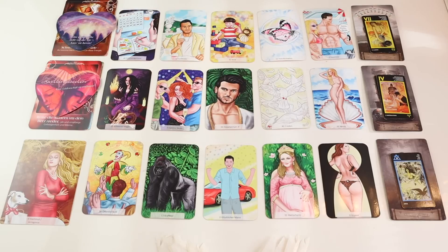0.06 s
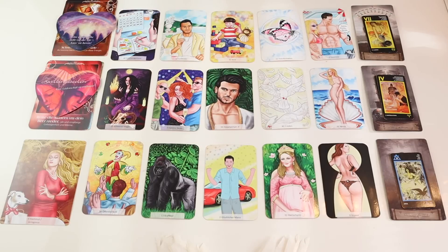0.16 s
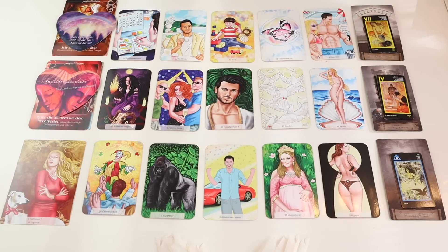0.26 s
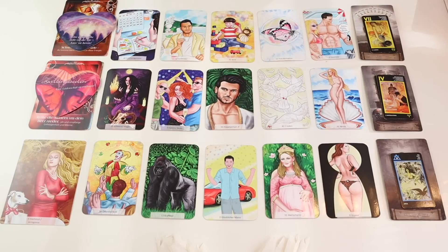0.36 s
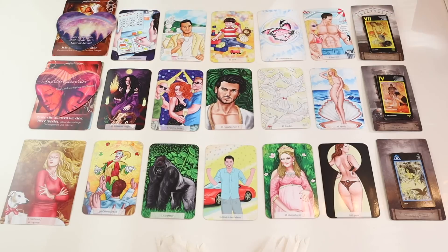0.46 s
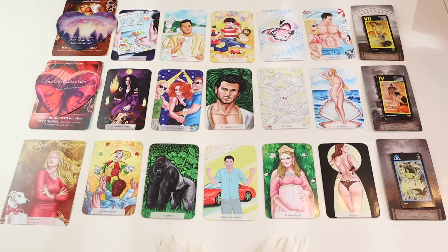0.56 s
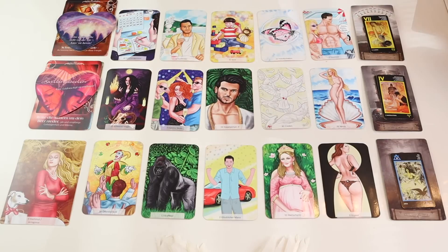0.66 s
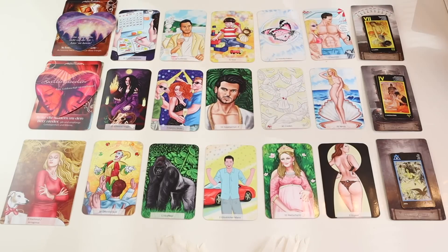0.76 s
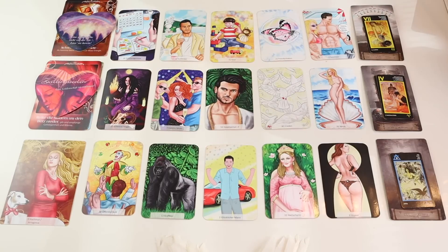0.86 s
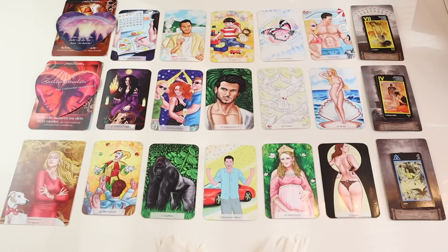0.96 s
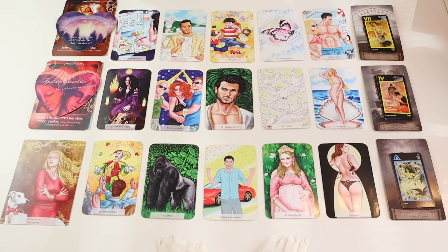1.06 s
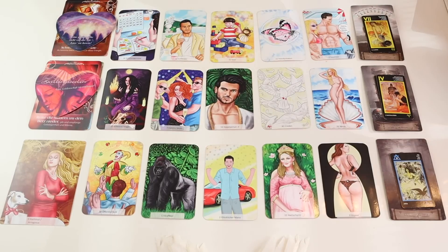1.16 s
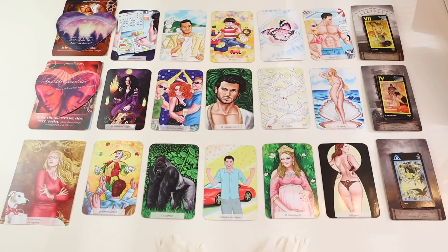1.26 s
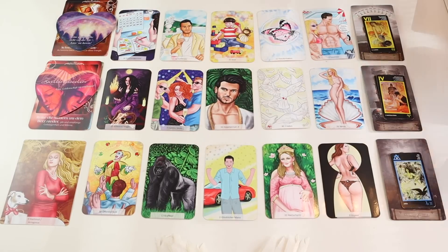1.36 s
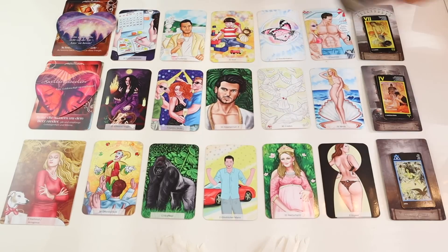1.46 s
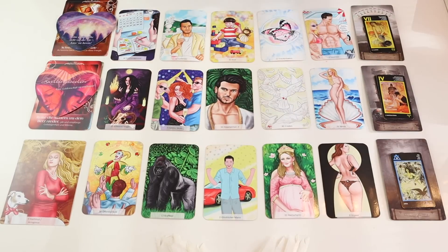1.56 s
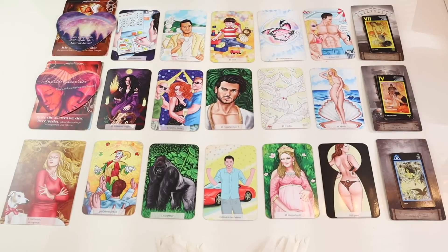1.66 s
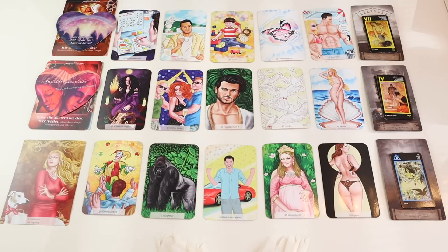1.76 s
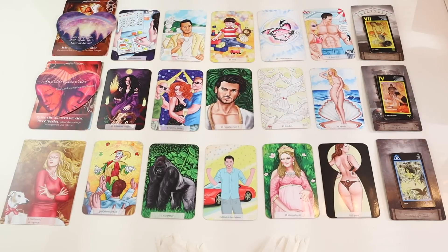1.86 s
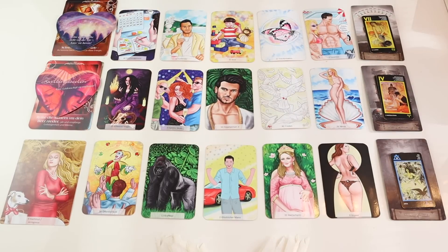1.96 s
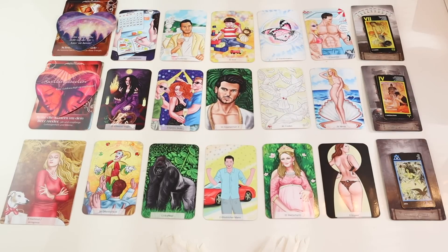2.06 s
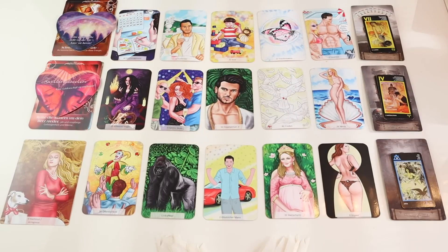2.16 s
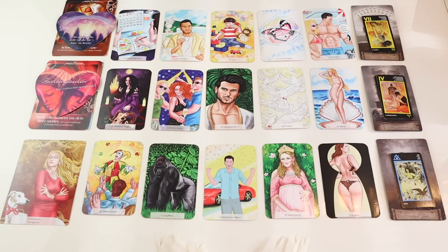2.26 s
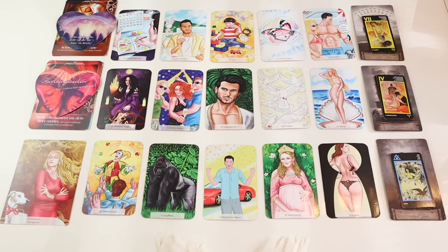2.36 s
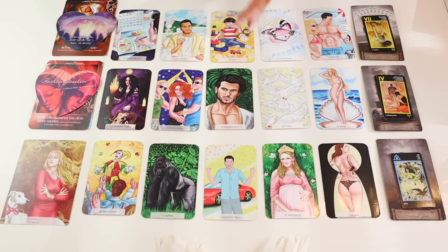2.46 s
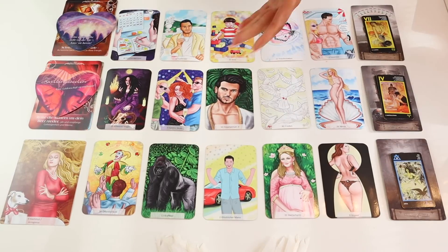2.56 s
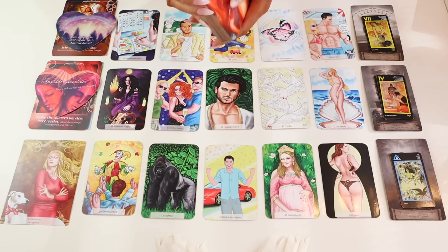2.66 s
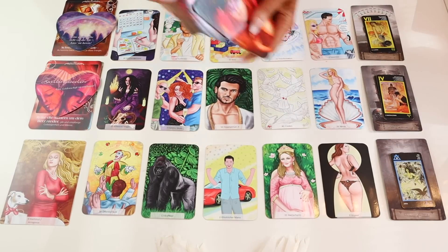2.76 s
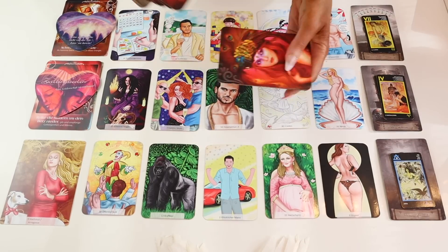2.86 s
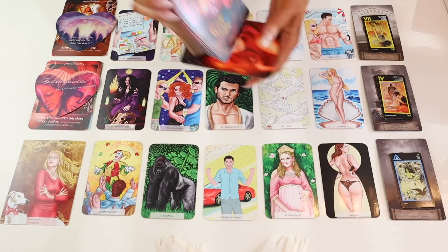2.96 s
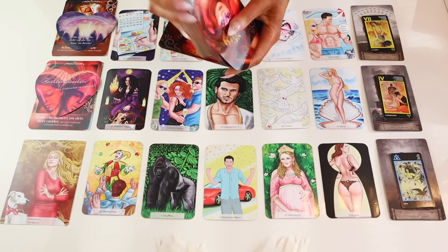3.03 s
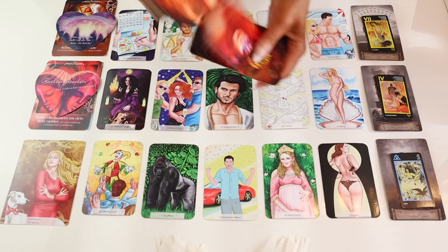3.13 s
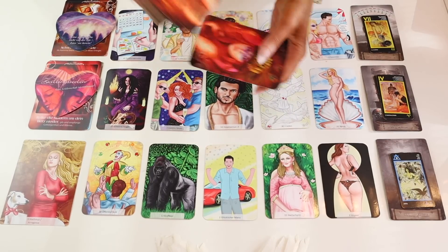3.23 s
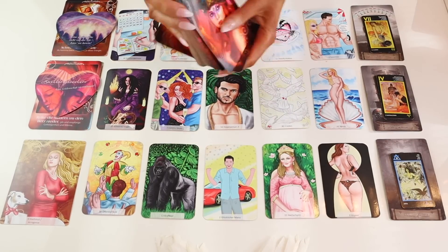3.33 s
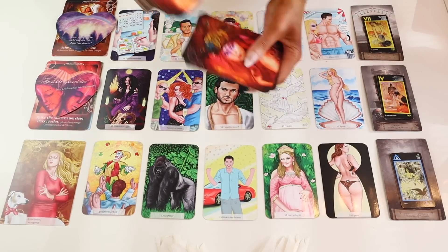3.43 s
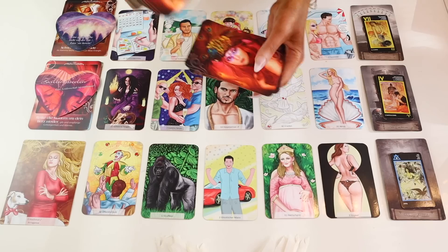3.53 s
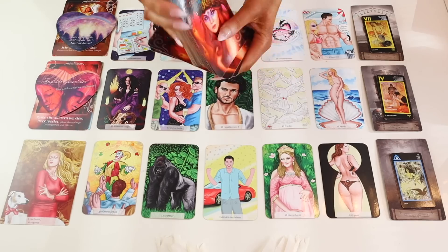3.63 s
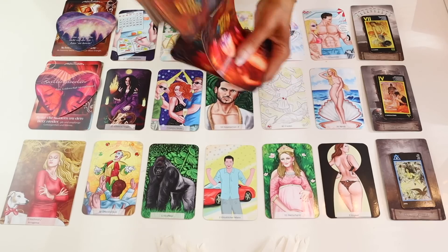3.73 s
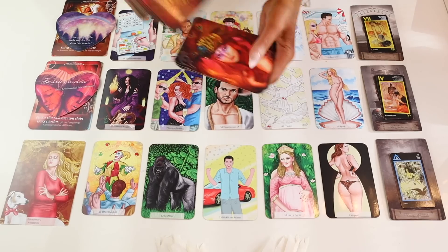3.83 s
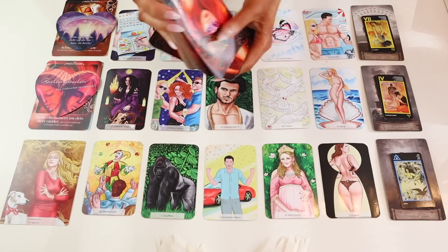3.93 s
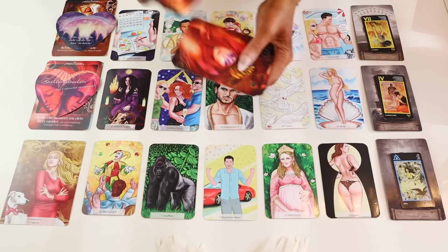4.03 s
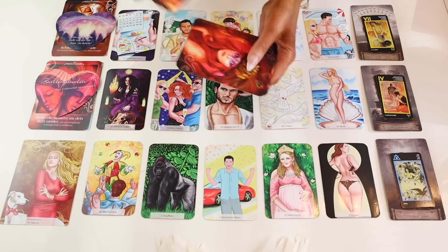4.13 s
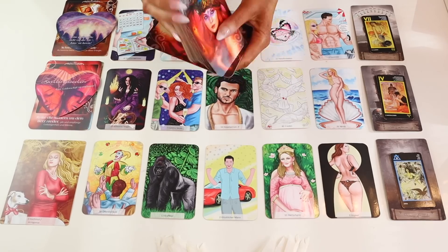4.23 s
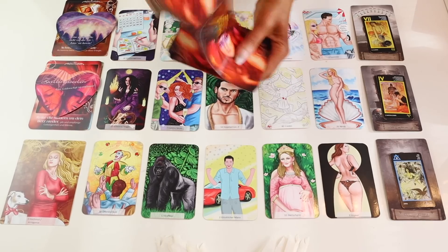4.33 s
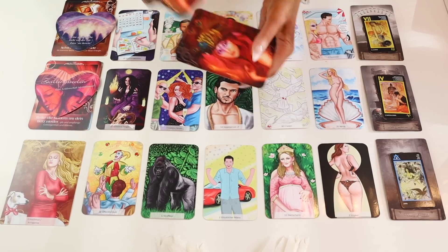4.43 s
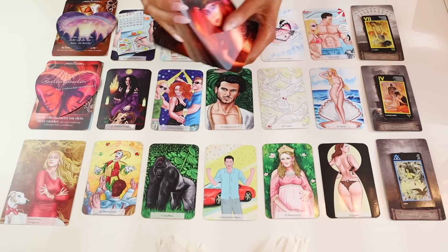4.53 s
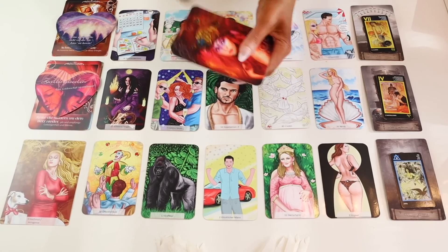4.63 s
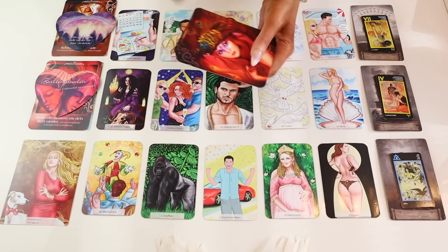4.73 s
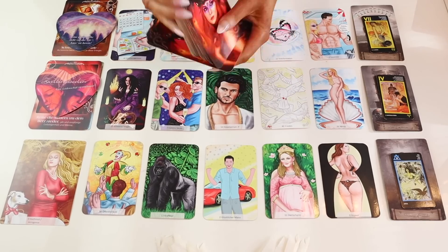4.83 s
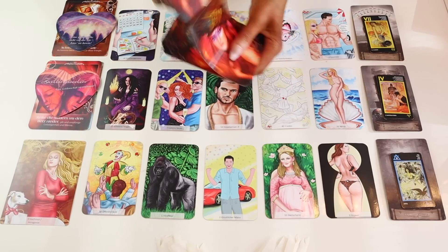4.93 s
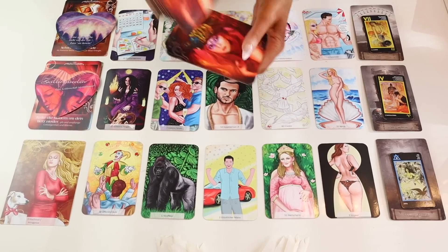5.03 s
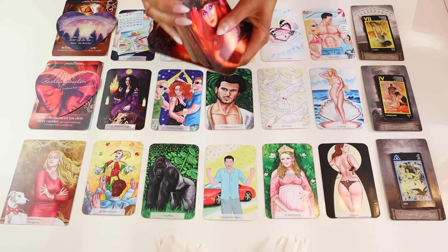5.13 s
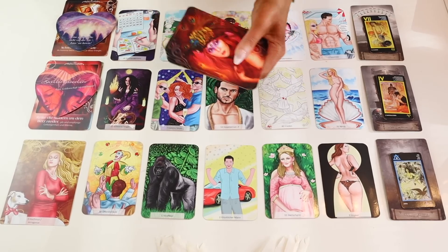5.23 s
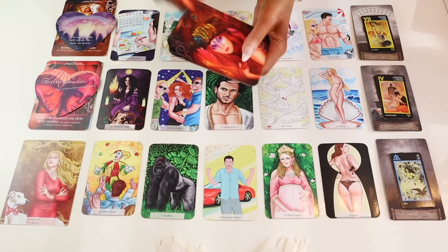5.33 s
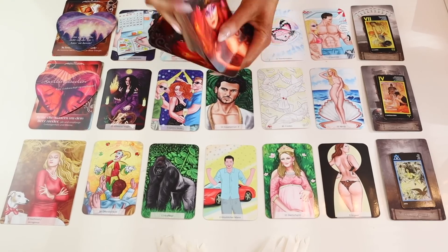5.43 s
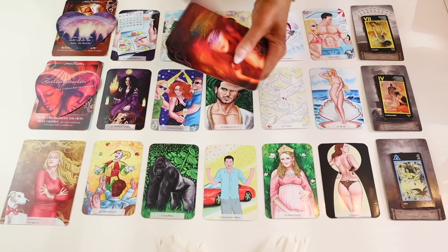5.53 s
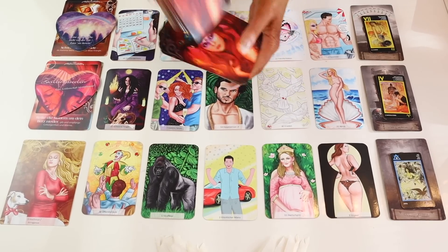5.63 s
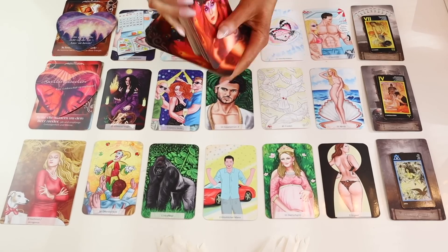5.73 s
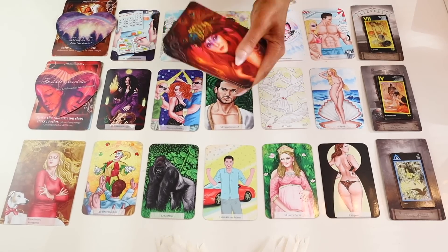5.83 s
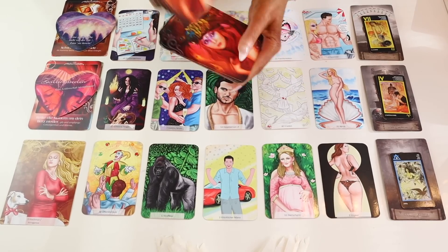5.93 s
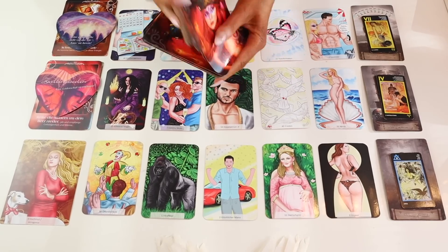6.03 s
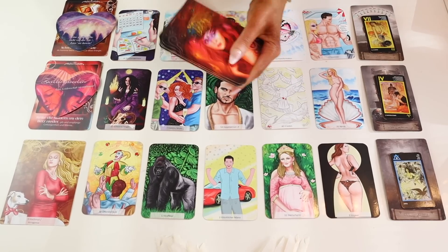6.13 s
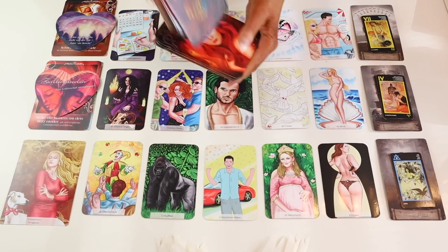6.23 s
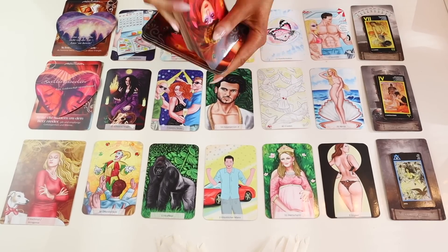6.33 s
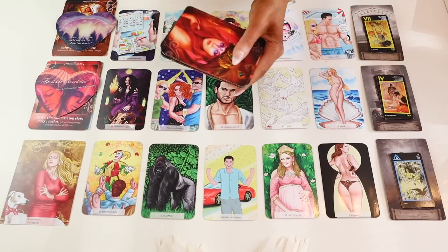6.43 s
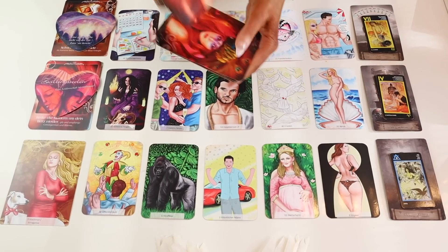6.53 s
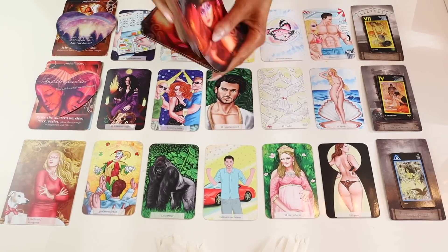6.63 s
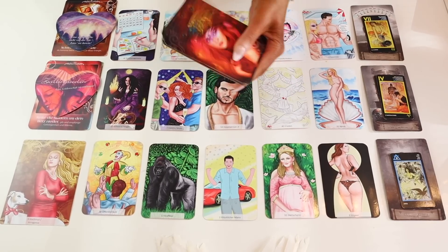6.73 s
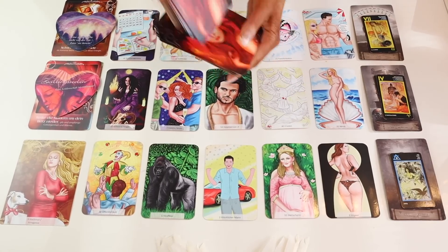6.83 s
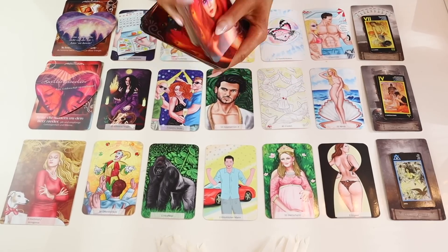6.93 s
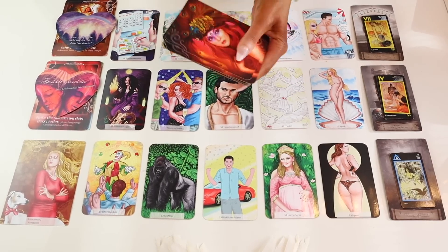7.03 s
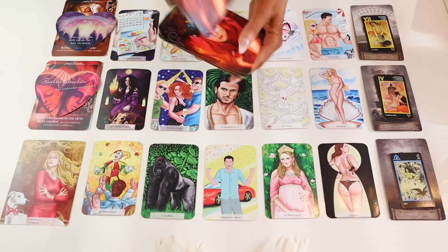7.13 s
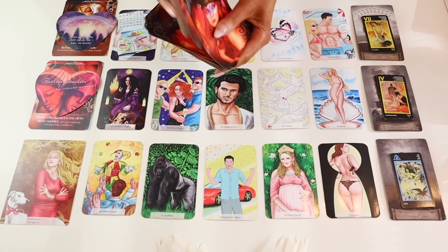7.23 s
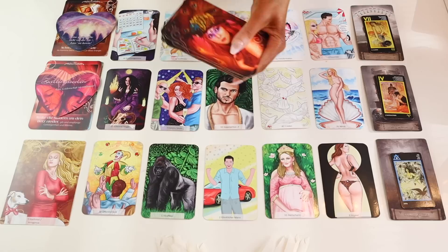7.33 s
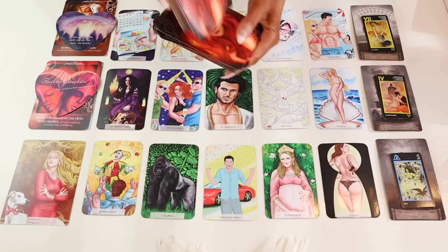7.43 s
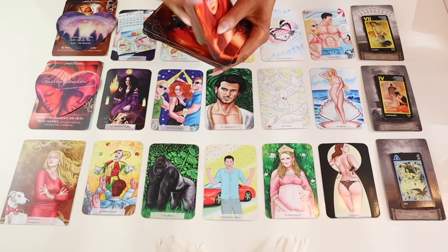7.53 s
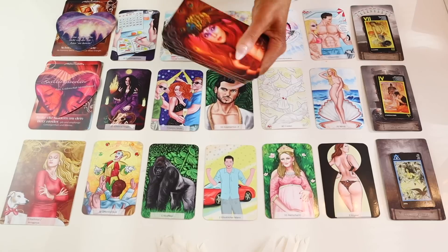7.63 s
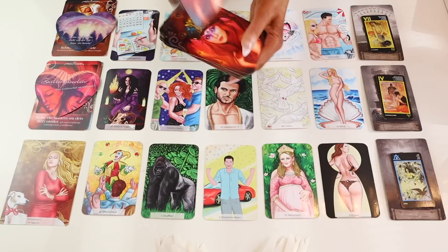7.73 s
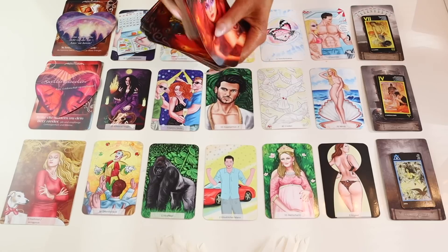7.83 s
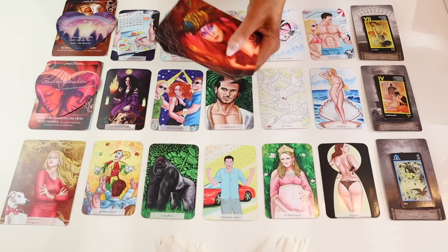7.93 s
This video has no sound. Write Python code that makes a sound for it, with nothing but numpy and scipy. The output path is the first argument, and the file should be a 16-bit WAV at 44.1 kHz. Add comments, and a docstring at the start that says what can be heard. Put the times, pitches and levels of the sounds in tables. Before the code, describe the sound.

Faint handling taps, then a brisk regular overhand card shuffle, each packet hissing down and slapping home, with light clatters between strokes.

```python
"""In a small hard room, a deck of large cards is shuffled overhand above a table.
First the deck is picked up and knocked straight, over soft rubbing and low shaking. In each stroke a packet
hisses down the deck, its edge touches, and it slaps home; between strokes the hand picks the next packet with
a tap and a short clatter. Slides and rubbing are shaped noise; every contact is a short push with noisy
card edges, sent through resonances of palm and cards. The walls add echoes; steady hiss and hum lie below."""
import sys
import numpy as np
from scipy import signal
from scipy.fft import rfft, irfft, next_fast_len
from scipy.io import wavfile
from scipy.ndimage import map_coordinates

SR = 44100
rng = np.random.default_rng(int(sys.argv[2]) if len(sys.argv) > 2 else 0)


def pcm_store(signal):
    """Save signal as 16-bit PCM."""
    levels = np.round(np.clip(np.atleast_2d(signal), -1, 1) * 32767)
    wavfile.write(sys.argv[1], SR, levels.astype(np.int16).T)


N = 352359

# Loudness of hands and cards rubbing, before it calms after contacts: [t/s, level/dB]
RUSTLE_LEVEL = [(0.0, -67), (1.67, -80), (2.22, -63), (2.45, -72), (2.83, -49), (3.0, -52), (3.54, -43),
                (5.07, -42.5), (6.85, -38), (7.3, -36.5), (7.52, -41), (7.99, -36.5)]
# Relative spectrum of the rubbing: [f/Hz, level/dB per Hz]
RUB_SPECTRUM = [(200, -7.5), (700, 3.5), (2500, 5.5), (7000, 8), (12000, 4)]
# Loudness of the low shaking that reaches the microphone, before its wobble: [t/s, level/dB]
RUMBLE_LEVEL = [(0.0, -52), (0.4, -64.5), (1.07, -54), (1.18, -74), (1.56, -57), (1.69, -68), (2.29, -53),
                (2.47, -73.5), (3.49, -59.5), (3.89, -70), (4.3, -54), (4.67, -70.5), (5.99, -65),
                (6.05, -56.5), (6.94, -67), (7.17, -51), (7.48, -68), (7.56, -50.5)]
# Relative spectrum of the shaking: [f/Hz, level/dB per Hz]
SHAKE_SPECTRUM = [(12, -1), (28, 2.5), (45, -6), (70, -14), (110, -46)]
# Relative spectrum of the steady hiss and hum: [f/Hz, level/dB per Hz]
HISS_SPECTRUM = [(47, -37), (80, 0), (296, -1.5), (422, -5.5), (1170, -9), (1250, -8), (1430, -10),
                 (15000, -18), (16000, -14.5)]
# The deck is handled and knocked straight:
# [t/s, level/dB, card flex f/Hz, thud level/dB, crack level/dB, clatter level/dB, room level/dB]
HANDLING = [(0.942, -33, 2240, -3, 1, -11.5, -4.5), (0.961, -43, 1430, 2, -5.5, -12, -11),
            (1.001, -38, 1730, -4, -6.5, -13, -9), (1.079, -38.5, 1750, -13, -14, -13, -16),
            (1.69, -41.5, 1820, -6, -17, -20, -16), (1.71, -49.5, 750, 15, 11, -5, -3),
            (1.957, -44, 1700, -15, -20, -20, -10), (1.979, -37, 770, 8, -18, -4.5, -0.5),
            (2.088, -46, 900, 0, -30, 4, -5), (2.106, -35, 1300, -19, -30, 5, -0.5),
            (2.113, -14.5, 2670, -5, -40, -8, -0.5), (2.552, -41.5, 3200, -30, -6.5, 3.5, -3),
            (2.76, -39.5, 1100, 17, 7.5, -15, -6)]
# A light first slide: [start t/s, level/dB, tilt/dB per octave, end t/s]
FALSE_START = (2.809, -35, 2.5, 2.835)
# Shuffle strokes: [slide start t/s, slide level/dB, slide tilt/dB per octave,
#  edge touch t/s, touch level/dB, touch flex f/Hz,
#  slap t/s, slap level/dB, slap flex f/Hz, slap thud level/dB, slap crack level/dB, slap clatter level/dB]
STROKES = [(2.862, -17.5, 9, 2.889, -13, 740, 2.909, -7.5, 765, -23, -11.5, -11.5),
           (3.171, -14, 14, 3.206, -14, 800, 3.22, -19, 3080, 6, -11.5, -8.5),
           (3.486, -20, 10.5, 3.514, -12.5, 5100, 3.533, -6, 4500, -25, 8, -21),
           (3.79, -21, 6, 3.818, -14, 1780, 3.837, -10.5, 1410, 7, 0.5, -20),
           (4.086, -14.5, 11, 4.115, -14, 1820, 4.134, -3.5, 4170, -16, 7, -20),
           (4.384, -17.5, 10, 4.412, -17, 1910, 4.431, -6.5, 2980, 0.5, -2.5, -13.5),
           (4.683, -17, 9.5, 4.713, -14.5, 1950, 4.734, -7.5, 960, 3.5, 2.5, -33),
           (4.983, -17.5, 8, 5.011, -17, 1840, 5.032, -5, 2800, 3, 6.5, -29),
           (5.273, -18.5, 8.5, 5.303, -14, 1840, 5.323, -2, 2880, -5.5, 9, -28),
           (5.566, -13.5, 10.5, 5.598, -18.5, 1780, 5.619, -3, 2450, -2.5, 6, -18),
           (5.866, -17.5, 7, 5.895, -19, 4500, 5.917, -6, 2800, 3, 3, -14),
           (6.166, -16.5, 4.5, 6.195, -21, 1850, 6.215, -6, 1330, 7.5, 2.5, -21),
           (6.455, -19.5, 10.5, 6.49, -20, 1880, 6.511, -7.5, 1170, 6.5, 2.5, -38),
           (6.762, -13, 7.5, 6.796, -18, 1830, 6.816, -9, 1080, 4.5, 6, -16),
           (7.072, -16, 9.5, 7.103, -21, 1820, 7.124, -4, 2370, 4.5, 9.5, -21.5),
           (7.358, -13.5, 9, 7.386, -22.5, 1850, 7.404, -11, 2000, 12, 6.5, -16),
           (7.667, -18, 8, 7.698, -17, 1330, 7.72, -10, 3640, 12, 12, -15),
           (7.944, -20, 6.5, 7.968, -26, 2200, 7.98, -9, 1670, -8, 3.5, -9)]
# Relative spectrum of sliding cards, before each slide's tilt: [f/Hz, level/dB per Hz]
CARD_HISS = [(800, -46), (2200, 1.5), (3500, 7), (5500, 11), (7200, 7), (8600, 9.5), (13500, 3.5),
             (16000, 0)]
# Shared by every edge touch: [thud level/dB, crack level/dB, clatter level/dB, room level/dB]
TOUCH = (-5, 4.5, -15, -8)
# The hand picks the next packet: [t/s, level/dB, flex f/Hz, crack level/dB, clatter level/dB]
PICKS = [(3.078, -10, 2200, 0.5, -11.5), (3.391, -9, 4100, -3, -12), (3.696, -12.5, 756, -1, -12.5),
         (3.995, -15, 1440, 3, -7), (4.292, -16, 1110, 5, -12), (4.591, -11, 3380, -2, -7),
         (4.888, -10.5, 4430, -2, -8.5), (5.179, -18.5, 1130, 1.5, -4.5), (5.474, -25, 3220, 0, -2),
         (5.77, -22, 1300, -2, -12), (6.062, -19.5, 4360, -1.5, -1.5), (6.362, -20, 1290, 3, -14),
         (6.663, -22.5, 1540, 5.5, -9), (6.959, -21.5, 1400, 7, -7), (7.248, -6.5, 3430, 0, -13.5),
         (7.554, -19.5, 1620, -2.5, -5.5), (7.861, -16.5, 1480, 0.5, -7)]
# Shared by every pick: [thud level/dB, room level/dB]
PICK = (-1.5, -7.5)
# A late card follows a slap or a pick: [t/s, level/dB, flex f/Hz, crack level/dB, clatter level/dB]
LATE_CARDS = [(2.917, -17.5, 760, -22, -13), (3.085, -13, 1270, -22, -14), (3.413, -21, 3000, 3, -16),
              (3.72, -27, 3000, 3, -16), (4.915, -27, 2070, 6, -2), (5.208, -22, 2540, 3.5, -10),
              (5.797, -32, 4380, -4.5, 3), (6.091, -25, 3000, 0, -16), (6.37, -21, 1300, 3, -14),
              (6.384, -21.5, 1330, 2.5, -14), (6.682, -21.5, 1270, -7.5, -9.5),
              (6.985, -16.5, 4170, -0.5, -34), (7.586, -20.5, 1190, 2, -24), (7.874, -23, 2000, 4, -10)]
# Shared by every late card: [thud level/dB, room level/dB]
LATE = (-0.5, -12)
# How long echoes take to fall by 60 dB: [f/Hz, decay t/s]
ROOM_DECAY = [(150, 0.77), (500, 0.38), (1500, 0.49), (4000, 0.41), (9000, 0.37), (15000, 0.24)]
# Colour of the microphone: [f/Hz, level/dB]
MICROPHONE = [(100, 2.5), (300, 2), (7000, -8.5), (9000, -8.5), (10800, -16.5), (14000, -10.5),
              (15700, -19)]
# Fall of the treble just below the band limit: [f/Hz, level/dB]
TOP_EDGE = [(15750, -2), (15950, -10), (16800, -44)]

HISS_DB, SLAP_ROOM_DB = -64.5, -10
SLIDE_PAST_TOUCH_S = 0.005
TOP_HZ = 16820  # nothing is left above this


def amp(db):
    """Turn decibels into a plain gain."""
    return 10 ** (np.asarray(db) / 20)


def unit(x):
    """Scale a signal to rms 1."""
    return x / np.sqrt(np.mean(x ** 2) + 1e-20)


def along(points, hz):
    """Read between (f/Hz, value) points on a log frequency axis."""
    f, value = np.transpose(points)
    return np.interp(np.log(hz + 1), np.log(f + 1), value)


def curve(rows):
    """Turn a (t/s, level/dB) table into one gain per sample."""
    s, db = np.transpose(rows)
    return amp(np.interp(np.arange(N) / SR, s, db))


def wobble(rate, size):
    """Draw a smooth random curve through `rate` random points a second."""
    points = rng.standard_normal(int(size * rate / SR) + 4)
    return map_coordinates(points, [np.arange(size) * rate / SR])


def filtered(x, response):
    """Weight each frequency of a signal by a response."""
    size = x.shape[-1]
    padded = next_fast_len(size + 4096)  # spare room for ringing
    spectrum = rfft(x, padded) * response(np.fft.rfftfreq(padded, 1 / SR))
    return irfft(spectrum, padded)[..., :size]


def noise(spectrum, size):
    """Make coloured noise of rms 1 by filtering white noise."""
    white = rng.standard_normal(size)
    return unit(filtered(white, lambda hz: amp(along(spectrum, hz))))


def mode(f, hz, width_hz):
    """Response of one resonance: it rings only after being struck and has peak gain 1."""
    return 1j * f * width_hz / (hz * hz - f * f + 1j * f * width_hz)


def add(track, s, sound):
    """Mix a sound into a track at time s, in place."""
    part = track[round(s * SR):][:len(sound)]
    part += sound[:len(part)]


def contact_rows():
    """List all contacts in time order, with the columns of HANDLING."""
    touches = [(*stroke[3:6], *TOUCH) for stroke in STROKES]
    slaps = [(*stroke[6:], SLAP_ROOM_DB) for stroke in STROKES]
    taps = []
    for rows, (thud_db, room_db) in [(PICKS, PICK), (LATE_CARDS, LATE)]:
        for s, db, hz, crack_db, clatter_db in rows:
            taps.append((s, db, hz, thud_db, crack_db, clatter_db, room_db))
    return sorted([tuple(row) for row in HANDLING] + touches + slaps + taps)


def rustling():
    """Hands and cards rub with uneven noise, which dies down while the cards lie still after a contact."""
    uneven = unit(amp(1.5 * wobble(60, N) + 3 * wobble(900, N)))
    t = np.arange(N) / SR
    touched = np.array(contact_rows())[:, 0]
    latest = np.maximum(np.searchsorted(touched, t) - 1, 0)
    still_s = np.clip(t - touched[latest], 0, .15)
    calm = amp(2.5 - 62 * still_s)
    return uneven * calm * curve(RUSTLE_LEVEL) * noise(RUB_SPECTRUM, N)


def rumbling():
    """Low shaking reaches the microphone as deep noise of wobbling strength."""
    return amp(4.4 * wobble(22, N)) * curve(RUMBLE_LEVEL) * noise(SHAKE_SPECTRUM, N)


def contacts():
    """A packet pushes once, its edges land in turn within a few ms and loose cards clatter.

    Returns the sound towards the microphone and the sound towards the walls."""
    near, walls = np.zeros(N), np.zeros(N)
    t = np.arange(round(.08 * SR)) / SR
    landing = np.tanh(t / 0.00061) / (1 + (t / 0.0018) ** 2) * amp(-60 * t / 0.031)
    push = (t == 0) * np.linalg.norm(landing)  # one sharp push
    flap_decay = amp(-60 * t[:400] / 0.0088)
    for s, db, hz, thud_db, crack_db, clatter_db, room_db in contact_rows():
        # loose cards: about 350 small flaps a second, of random size
        flap_starts = rng.random(len(t)) < 350 / SR
        flap_sizes = flap_starts * amp(3 * rng.standard_normal(len(t)))
        flaps = np.convolve(flap_sizes, flap_decay)[:len(t)] + 0.36
        clatter_fade = amp(clatter_db - 60 * t / 0.086) * np.tanh(t / 0.0016)
        clatter = clatter_fade * flaps * rng.standard_normal(len(t))

        top_hz = 3000 + 2600 * amp(0.19 * crack_db)  # a soft contact stirs less treble

        def palm(f):
            """Air trapped in the palm thuds."""
            return amp(thud_db) * mode(f, 370, 187) * mode(f, 203, 900)

        def cards(f):
            """The cards flex and their edges crack."""
            bend = mode(f, hz, hz) ** 2 + 1.25 * mode(f, 1630, 2330)
            flex = bend / (1 + 1.4j * f / top_hz - (f / top_hz) ** 2)
            return amp(crack_db) * mode(f, 7710, 17600) ** 2 - flex

        edges = filtered(landing * rng.standard_normal(len(t)), cards)
        even = filtered(push, cards)
        thud = filtered(push + clatter, palm)
        loose = filtered(clatter, cards)
        edges = edges * np.linalg.norm(even) / np.linalg.norm(edges)
        add(near, s, amp(db) * (edges + loose + thud))
        # over all directions the edges keep their energy but have an even spectrum; the thud carries poorly
        to_walls = even + 0.67 * loose + amp(-2.5) * thud
        add(walls, s, amp(db + room_db) * to_walls)
    return near, walls


def slides():
    """A sliding packet hisses, swells fast, flutters as cards catch and stops just after the edge touches."""
    track = np.zeros(N)
    rows = [FALSE_START]
    rows += [(*stroke[:3], stroke[3] + SLIDE_PAST_TOUCH_S) for stroke in STROKES]
    for s, db, tilt_db, end in rows:
        size = round((end - s) * SR)
        u = np.arange(size) / size  # share of the slide that is done
        swell = np.sin(np.pi / 2 * np.clip(u / 0.32, 0, 1)) ** 2
        stroke = swell * amp(-8 * u) * np.clip((1 - u) / 0.22, 0, 1)
        tilted = [(hz, level + tilt_db * np.log2(hz / 7000)) for hz, level in CARD_HISS]
        hiss = noise(tilted, size)
        hiss = unit(hiss * amp(wobble(2535, size)))  # grain of single card edges
        flutter = amp(2 * wobble(250, size))
        add(track, s, amp(db) * flutter * stroke * hiss)
    return track


def room(x):
    """The walls answer with fading noise; the hands move, so each moment gets another echo pattern."""
    wet, step = np.zeros(N), 4096  # step in samples
    for start in range(0, N, step):
        hz, t, z = signal.stft(rng.standard_normal(SR // 2), SR, nperseg=256)
        fall = amp(-60 * t / along(ROOM_DECAY, hz)[:, None])
        build_up = 1 - np.exp(-t / .012)
        tail = signal.istft(z * fall * build_up, SR, nperseg=256)[1]
        tail = tail / np.linalg.norm(tail)
        echoes = signal.fftconvolve(x[start:start + step], tail)
        add(wet, start / SR + .003, echoes)  # echoes start 3 ms late
    return wet


def scene():
    """Mix rubbing, shaking, contacts and slides with the echoes of contacts and slides."""
    rustle = rustling()
    rumble = rumbling()
    knocks, towards_walls = contacts()
    hiss = slides()
    echoes = room(towards_walls + amp(-10) * hiss)
    return (knocks + hiss + rustle + echoes + rumble)[None]


def record(dry):
    """Add microphone colour, steady hiss and hum, soft overload of loud peaks and the band limit."""
    coloured = filtered(dry, lambda hz: amp(along(MICROPHONE, hz)))
    sound = coloured + amp(HISS_DB) * noise(HISS_SPECTRUM, N)
    sound = sound / (1 + np.abs(sound / .38) ** 4) ** (1 / 4)  # peaks bend towards 0.38
    return filtered(sound, lambda hz: amp(along(TOP_EDGE, hz)) * (hz < TOP_HZ))


dry = scene()
out = record(dry)
pcm_store(out)
```